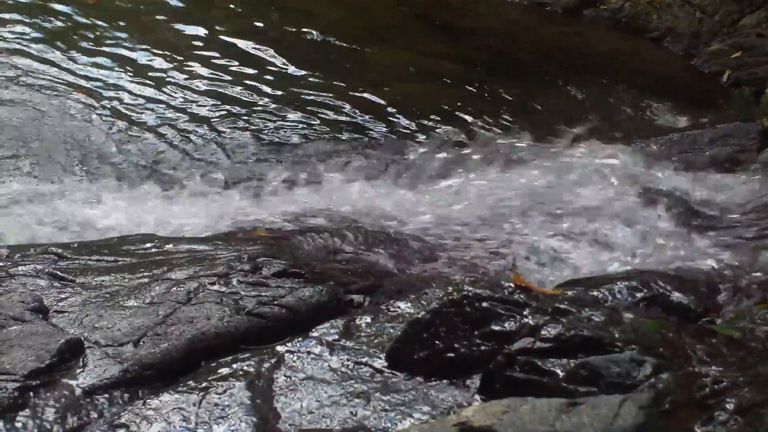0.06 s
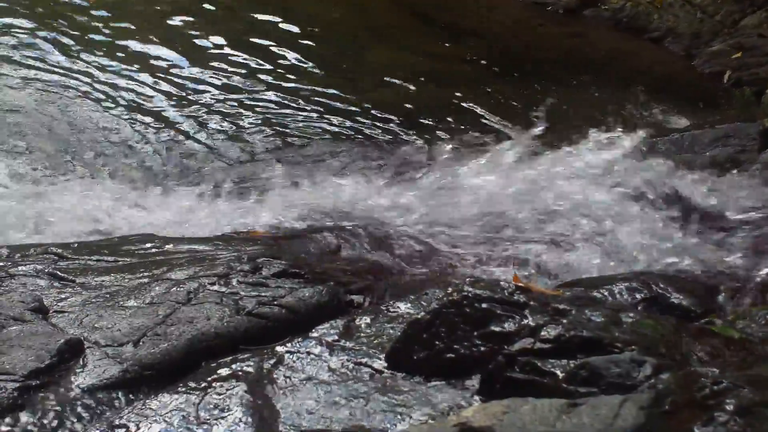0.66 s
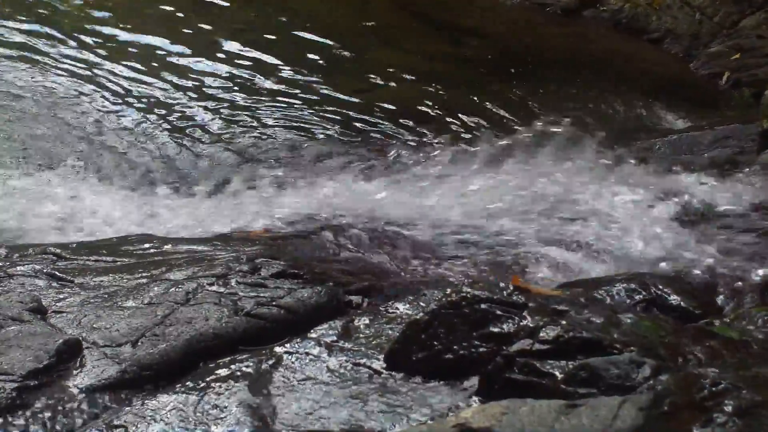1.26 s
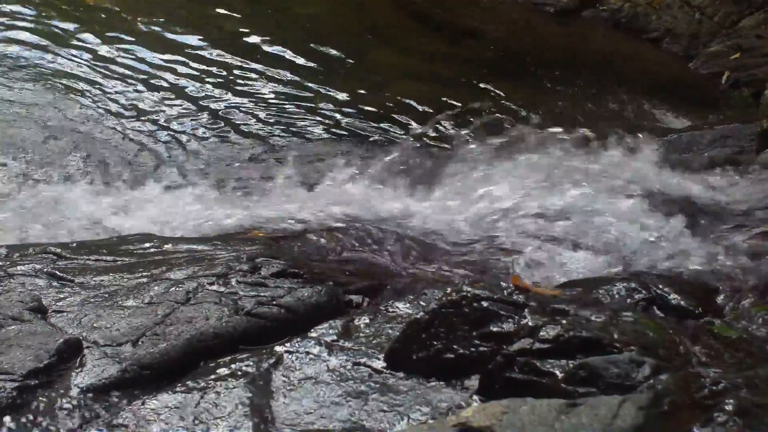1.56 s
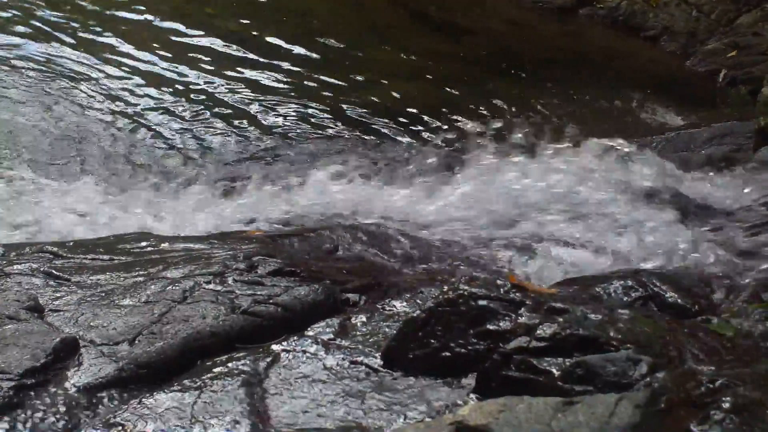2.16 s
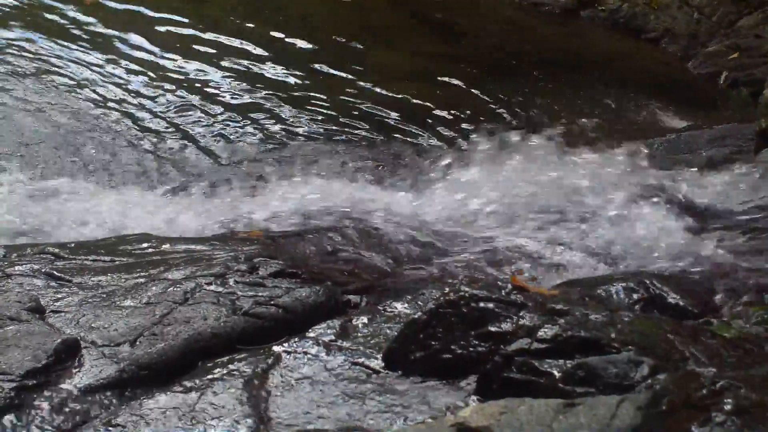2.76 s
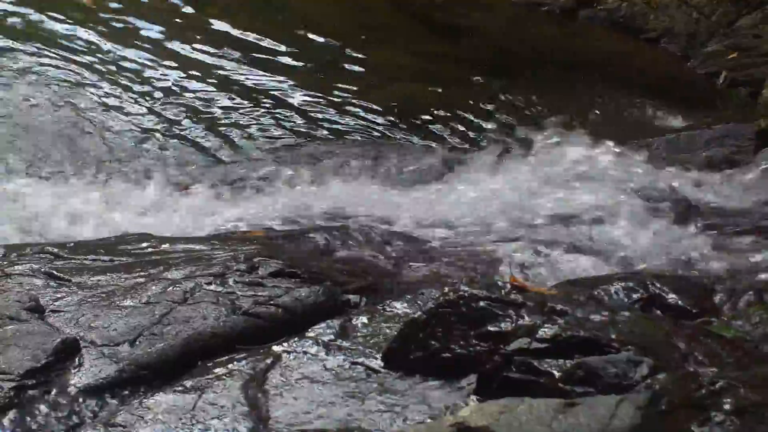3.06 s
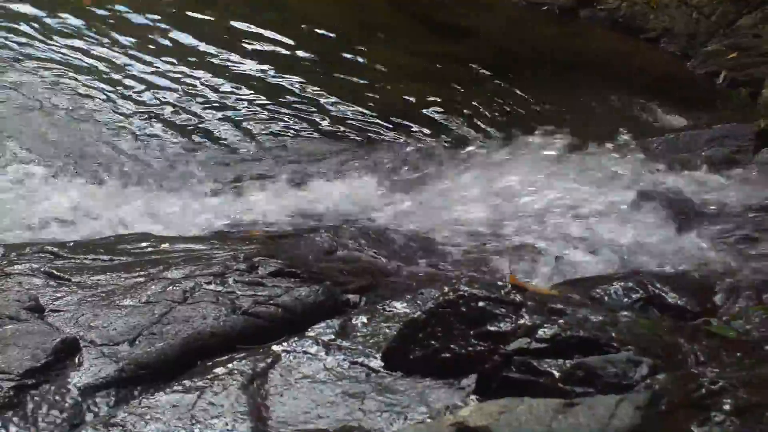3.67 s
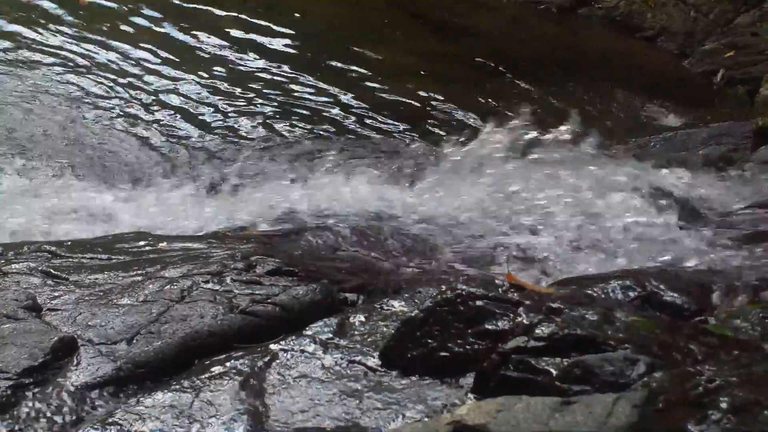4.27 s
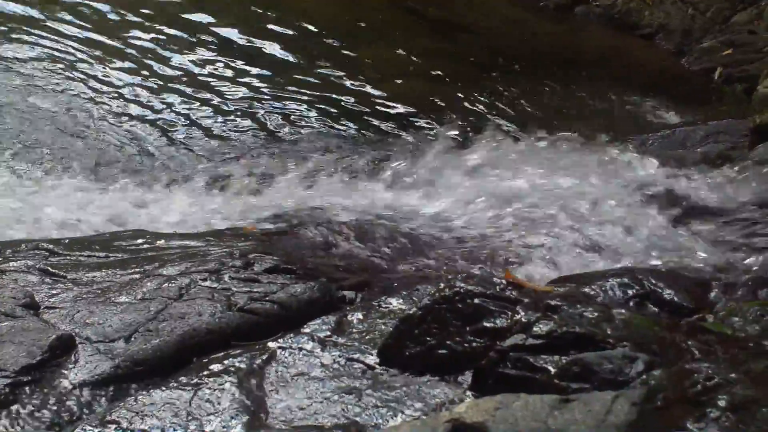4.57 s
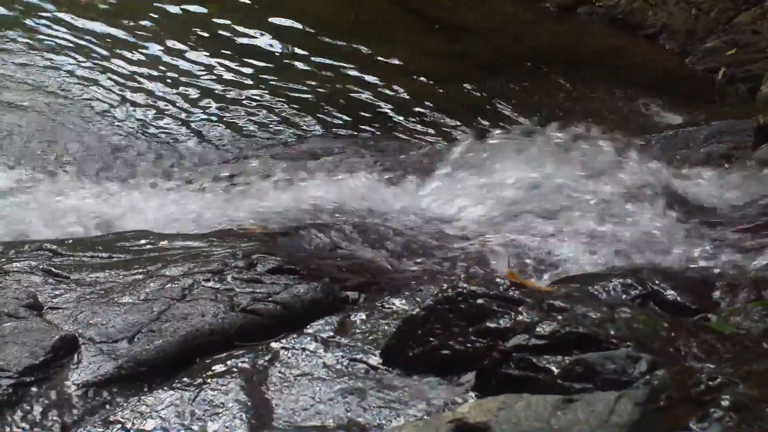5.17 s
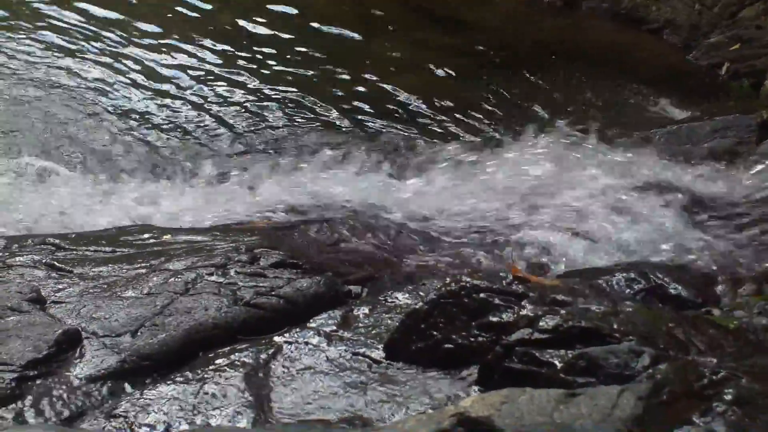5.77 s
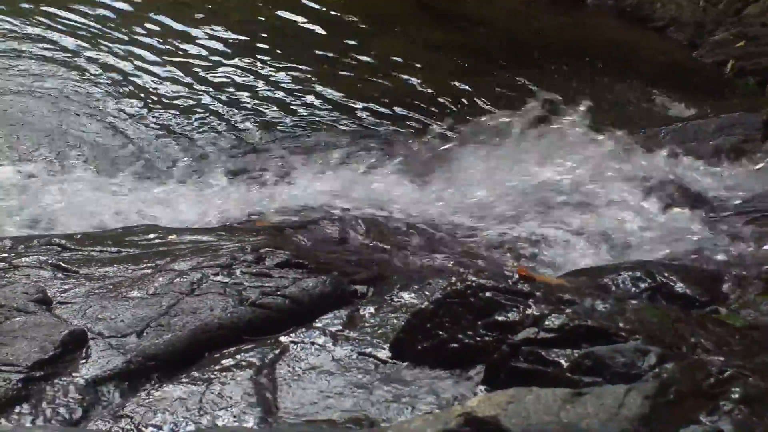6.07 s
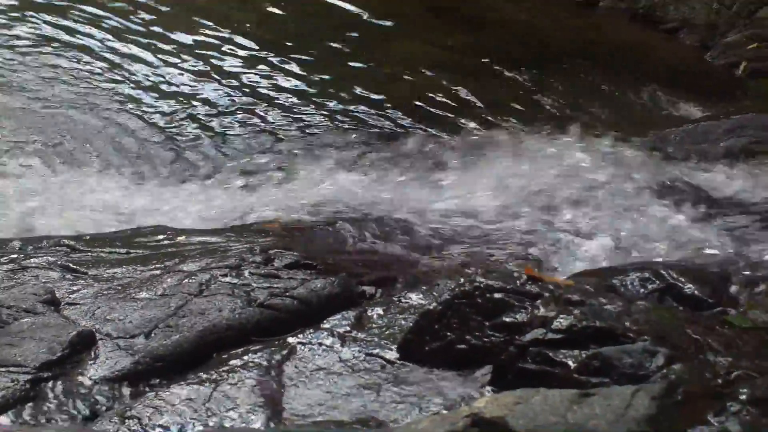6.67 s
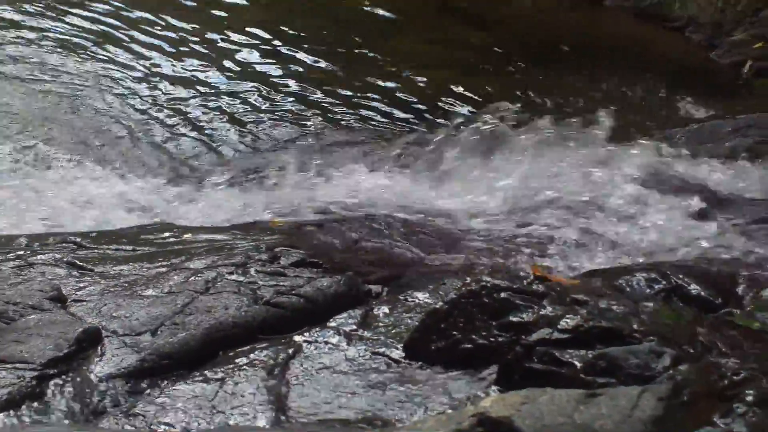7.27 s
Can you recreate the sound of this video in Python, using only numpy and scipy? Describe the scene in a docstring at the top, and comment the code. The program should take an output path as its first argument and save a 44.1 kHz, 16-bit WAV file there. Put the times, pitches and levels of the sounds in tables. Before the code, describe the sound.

A small river cascade rushes and churns steadily over rock, with fizzing spray and occasional bubbly gulps.

```python
"""A small river cascade pours over rock, heard from the bank through a mono microphone.
Air trapped by the falling water rings as bubbles: clouds of them make the churning body of the sound
and a hollow ring, single large ones gulp, and bursting foam and spray add the hiss above.
One sharp tick sounds close by; a low drone, perhaps a distant engine, fades and sinks in pitch."""
import sys
import numpy as np
from scipy import signal
from scipy.fft import rfft, irfft
from scipy.io import wavfile

SR = 44100
rng = np.random.default_rng(int(sys.argv[2]) if len(sys.argv) > 2 else 0)


def pcm_store(signal):
    """Save signal as 16-bit PCM."""
    levels = np.round(np.clip(np.atleast_2d(signal), -1, 1) * 32767)
    wavfile.write(sys.argv[1], SR, levels.astype(np.int16).T)


N = 327222


def churn():
    """Incoherent superposition: countless bubbles merge into a wash, and nearer ones ring out of it."""
    # spectral density of white water: f/Hz, level/dB
    spectrum = [(20, -16.5), (45, -14), (90, -12), (160, -8.5), (200, -5.5), (320, -3.5), (385, -5.5),
                (500, -1.75), (1000, 0), (1200, -1), (1510, -2.5), (1640, -7), (1800, -10.5), (2300, -18.5),
                (5000, -34.5)]
    wash_db, near_db = -34, -37.5
    wash = rush(spectrum, patchy_db=0.94, patch_hz=300, patch_s=0.031)
    near = bubbles(low_hz=139.1, high_hz=2423, per_s=2600, cycles=23.4, rise=0.13, spread_db=2.5, count=48)
    return gain_of(wash_db) * wash + gain_of(near_db) * evened(colour(near, spectrum))


def spray():
    """Small bubbles resonate high: foam fizzes while droplets patter back on the water."""
    # spectral density of foam and spray: f/Hz, level/dB
    spectrum = [(900, -25.5), (1950, -0.5), (2200, -3), (2500, 1.5), (2690, 0), (3050, 0.55), (3550, -1),
                (3780, -3), (3980, -2.9), (4250, -0.8), (5600, -0.8), (5870, 0.9), (6250, -2), (6600, -3.5),
                (7100, -6), (7500, -25)]
    fizz_db, drops_db = -42.5, -46.5
    fizz = rush(spectrum, patchy_db=0.82, patch_hz=600, patch_s=0.028)
    drops = bubbles(low_hz=1590, high_hz=7260, per_s=5000, cycles=24, rise=0.081, spread_db=2.6, count=36)
    return gain_of(fizz_db) * fizz + gain_of(drops_db) * evened(colour(drops, spectrum))


def hollow():
    """Cavity resonance: bubbles ring in a hollow of the fall, its pitch drifting as the water shifts."""
    # strength of the hollow ring: t/s, level/dB
    levels = [(0, -51), (.9, -47.5), (1.5, -54), (5.95, -53), (6.15, -42), (6.9, -41.5), (7.42, -47)]
    centre_hz, bandwidth_hz, drift_hz = 995, 71, 44.5
    hz = np.fft.rfftfreq(N, 1 / SR)
    cloud = bubbles(low_hz=781, high_hz=1142, per_s=220, cycles=36, rise=0.1, spread_db=1.0, count=12)
    ringing = irfft(rfft(cloud) / (1 + 2j * (hz - centre_hz) / bandwidth_hz), N)
    drift_cycles = np.cumsum(drift_hz * wander(rate_hz=2.7)) / SR
    shifted = (signal.hilbert(ringing) * np.exp(2j * np.pi * drift_cycles)).real
    return gain_of(follow(levels)) * evened(shifted)


def gulps():
    """Free oscillation of single large air pockets, each with its own upward chirp."""
    # air pockets: t/s, f/Hz, level/dB, t60/s, rise as a fraction of f
    pockets = [(.372, 707, -28, 0.11, .1), (.413, 260, -27.5, 0.069, .15), (.528, 203, -31, .08, 0.09),
               (.705, 1000, -27.5, 0.075, .1), (.858, 1200, -23, .055, .1), (1.662, 1540, -28, 0.051, .07),
               (2.93, 636, -24.5, 0.055, .2), (3.7632, 850, -24, .052, 1.5), (4.074, 1140, -26, .045, 0.13),
               (4.075, 720, -21, 0.03, .1), (5.052, 864, -23, 0.049, .1), (5.064, 620, -26, .05, .1),
               (5.872, 408, -26, 0.052, .1), (6.141, 794, -29, .055, .15), (6.975, 1430, -24.5, 0.099, .07),
               (7.317, 1320, -26, .07, .07)]
    out = np.zeros(N)
    for s, hz, level_db, t60, rise in pockets:
        add(out, s, gain_of(level_db) * bubble(hz, t60, rise))
    return out


def tick():
    """Impact excitation: a small hard contact cracks and sets damped modes ringing for milliseconds."""
    # modes of the struck body: f/Hz, level/dB, t60/s
    modes = [(1400, -4, .014), (1800, -6.5, 0.012), (2550, -6, 0.01), (3190, -2.5, .007),
             (4300, 5.5, 0.0058), (6050, -3, 0.0061)]
    # spectral density of the crack: f/Hz, level/dB
    crack_spectrum = [(500, -20), (1500, -2), (6000, -5), (8000, -16)]
    # the contact and its rebound: t/s, level/dB
    contacts = [(6.5864, -15), (6.5868, -31)]
    crack_db, crack_decay_s, attack_s = -6.5, 0.0013, 0.00051
    t = np.arange(SR // 20) / SR
    ring = sum(gain_of(db - 60 * t / t60) * np.sin(2 * np.pi * hz * t) for hz, db, t60 in modes)
    attack = 1 - np.exp(-t / attack_s)
    out = np.zeros(N)
    for s, level_db in contacts:
        noise = evened(colour(rng.standard_normal(N), crack_spectrum))[:len(t)]
        crack = gain_of(crack_db) * noise * np.exp(-t / crack_decay_s)
        add(out, s, gain_of(level_db) * (ring + crack) * attack)
    return out


def drone():
    """A low tone, amplitude-modulated at random, glides down over a soft rumble that dies away."""
    # strength of the tone: t/s, level/dB
    levels = [(0, -33), (.11, -30), (.2, -31.5), (.3, -42.5), (.48, -42.5), (.64, -52.5), (1.35, -53.5),
              (2.1, -59), (2.35, -50.5), (2.6, -58), (7.42, -60.5)]
    # spectral density of the rumble: f/Hz, level/dB
    rumble_spectrum = [(15, -11.5), (42, 0.5), (90, 0), (230, 2), (400, -19), (1000, -55)]
    start_hz, sag_hz_per_s, waver_db = 109.6, 4.2, -0.9
    rumble_start_db, rumble_floor_db, fade_s = -42, -66, 2.6
    t = np.arange(N) / SR
    hz = start_hz - sag_hz_per_s * t
    tone = np.sqrt(2) * np.sin(2 * np.pi * np.cumsum(hz) / SR)
    tone_db = follow(levels) + waver_db * wander(rate_hz=7)
    rumble = evened(colour(rng.standard_normal(N), rumble_spectrum))
    rumble_db = rumble_floor_db + (rumble_start_db - rumble_floor_db) * np.exp(-t / fade_s)
    return gain_of(tone_db) * tone + gain_of(rumble_db) * rumble


def rush(spectrum, patchy_db, patch_hz, patch_s):
    """Modulated noise: the level swells in short patches of time and pitch as air pockets break up."""
    size, hop = 512, 128
    frames, hz = N // hop + 5, np.fft.rfftfreq(size, 1 / SR)
    real, imag, field = rng.standard_normal((3, frames, len(hz)))
    along_time = np.fft.fftfreq(frames, hop / SR)[:, None] * patch_s
    along_pitch = np.fft.fftfreq(len(hz), hz[1]) * patch_hz
    smoothing = np.exp(-(2 * along_pitch) ** 2) / (1 + (2 * along_time) ** 2)
    patches = evened(np.fft.ifft2(np.fft.fft2(field) * smoothing).real)
    spectrogram = (real + 1j * imag) * gain_of(patchy_db * patches)
    noise = signal.istft(spectrogram.T, nperseg=size, noverlap=size - hop)[1][:N]
    return evened(colour(noise, spectrum))


def bubbles(low_hz, high_hz, per_s, cycles, rise, spread_db, count):
    """A random point process: bubbles are born independently, the small, high ones more often."""
    out = np.zeros(N)
    pitches = np.geomspace(low_hz, high_hz, count)
    for hz in pitches:
        born = rng.random(N) < per_s * hz / pitches.sum() / SR
        strength_db = spread_db * np.minimum(rng.exponential(1, N), 4)
        t60 = cycles * rng.uniform(0.67, 1.46) / hz
        ring = bubble(hz, t60, rise)
        out += signal.oaconvolve(born * gain_of(strength_db), ring / np.linalg.norm(ring))[:N]
    return out - out.mean()


def bubble(hz, t60, rise):
    """A damped oscillator: a bubble rings down, rising in pitch as it nears the surface."""
    t = np.arange(0, t60, 1 / SR)
    envelope = gain_of(-60 * t / t60) * (1 - np.exp(-2 * hz * t))
    return envelope * np.sin(2 * np.pi * hz * t * (1 + rise * t / t60 / 2))


def gain_of(db):
    """Amplitude ratio of a level in decibels."""
    return 10 ** (np.asarray(db) / 20)


def evened(x):
    """Normalisation to rms 1."""
    return x / np.sqrt(np.mean(x ** 2) + 1e-20)


def follow(rows):
    """Linear interpolation of a level curve at every sample."""
    s, level_db = np.transpose(rows)
    return np.interp(np.arange(N) / SR, s, level_db)


def colour(x, spectrum):
    """Zero-phase filtering by a spectrum interpolated on a log-frequency axis."""
    points_hz, points_db = np.transpose(spectrum)
    hz = np.fft.rfftfreq(N, 1 / SR)
    response_db = np.interp(np.log(hz + 1), np.log(points_hz + 1), points_db)
    return irfft(rfft(x) * gain_of(response_db), N)


def wander(rate_hz):
    """Filtered noise: a smooth fluctuation of rms 1, up to about the given rate."""
    hz = np.fft.rfftfreq(N, 1 / SR)
    response = hz / (hz + 2) / (1 + (hz / rate_hz) ** 2)
    return evened(irfft(rfft(rng.standard_normal(N)) * response, N))


def add(mix, s, sound):
    """Superposes a sound on the mix, starting at s seconds."""
    part = mix[round(s * SR):][:len(sound)]
    part += sound[:len(part)]


def scene():
    """Linear superposition, alike in both channels; churn and spray each surge a little at random."""
    # slow swell of the churn: t/s, level/dB
    swell = [(0, 0.3), (.9, 0), (1.4, -0.26), (3.2, 0.1), (3.9, 0), (5.1, -0.26), (5.6, -0.1), (6.2, -0.16),
             (6.95, 0.5), (7.42, 0)]
    churn_db = follow(swell) + 0.18 * wander(rate_hz=7)
    spray_db = 0.23 * wander(rate_hz=7)
    water = churn() * gain_of(churn_db) + spray() * gain_of(spray_db) + hollow() + gulps()
    return np.tile(water + drone() + tick(), (2, 1))


def record(dry, notch_hz=1335, notch_width_hz=85, notch_db=-6.0, cutoff_hz=7450):
    """Frequency response of the microphone: one narrow midrange dip, then a low-pass band limit."""
    hz = np.fft.rfftfreq(N, 1 / SR)
    dip_db = notch_db * np.exp(-((hz - notch_hz) / notch_width_hz) ** 2)
    coloured = irfft(rfft(dry) * gain_of(dip_db), N)
    low_pass = signal.firwin(511, cutoff_hz, window=("kaiser", 9), fs=SR)
    return signal.oaconvolve(coloured, low_pass[None], "same")


dry = scene()
out = record(dry)
pcm_store(out)
```